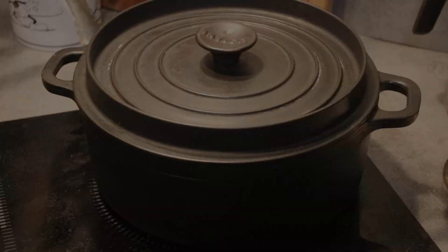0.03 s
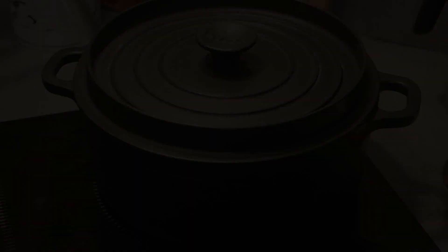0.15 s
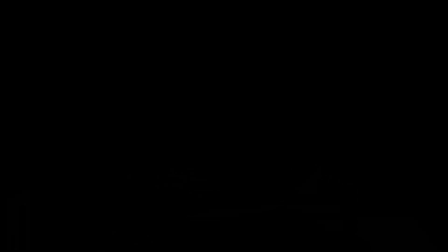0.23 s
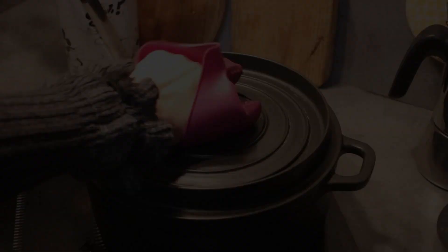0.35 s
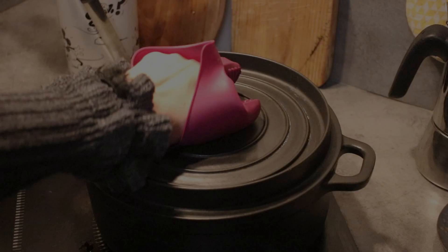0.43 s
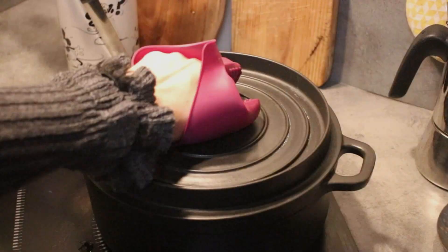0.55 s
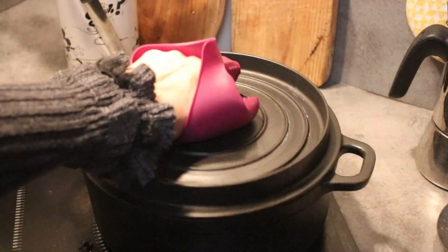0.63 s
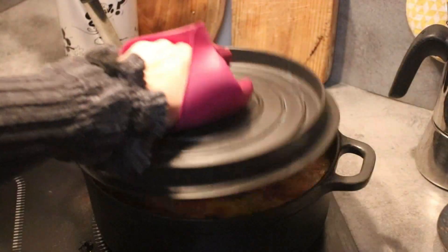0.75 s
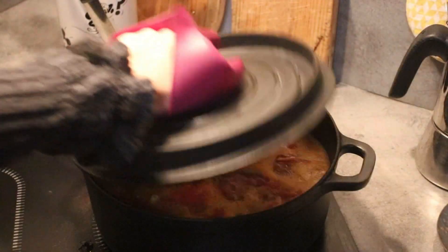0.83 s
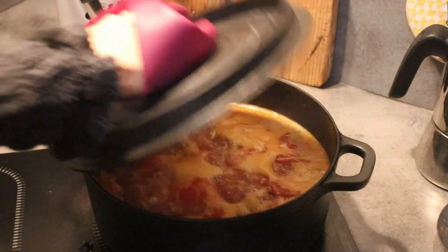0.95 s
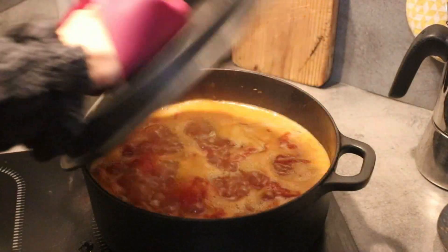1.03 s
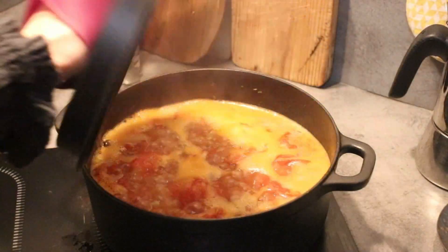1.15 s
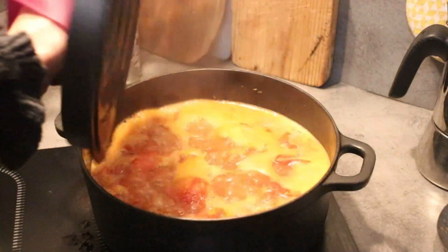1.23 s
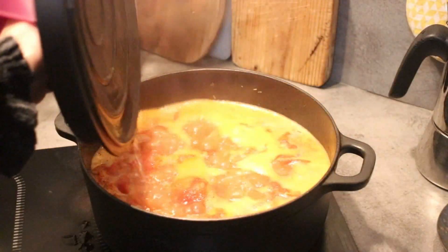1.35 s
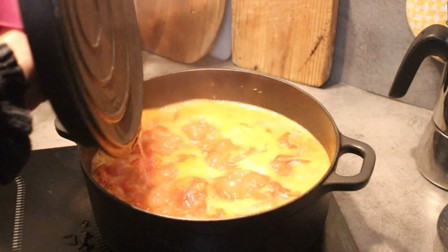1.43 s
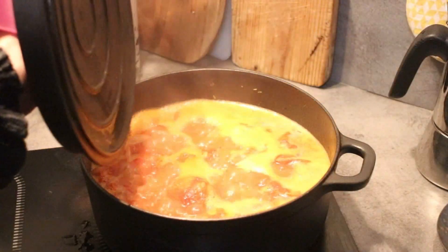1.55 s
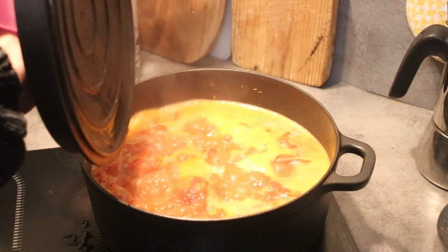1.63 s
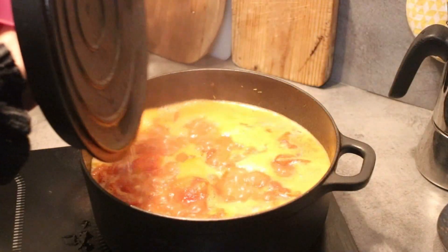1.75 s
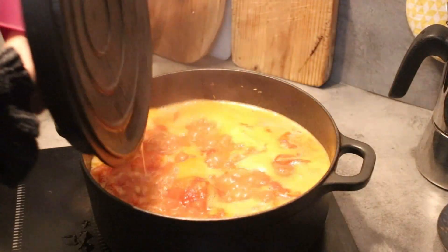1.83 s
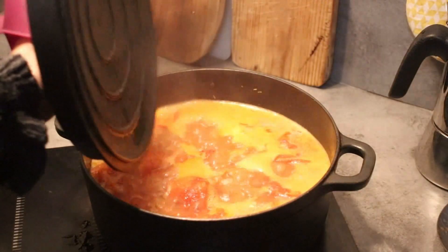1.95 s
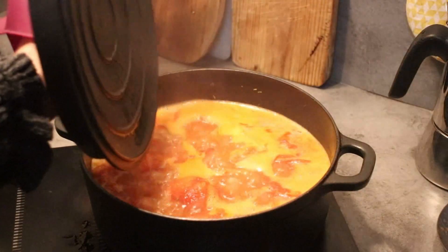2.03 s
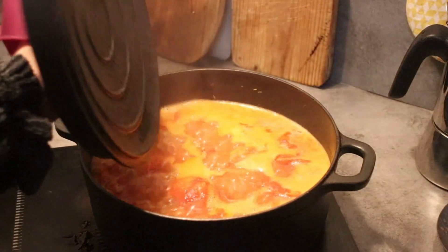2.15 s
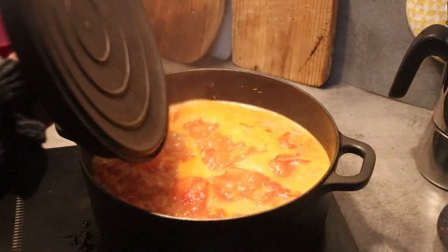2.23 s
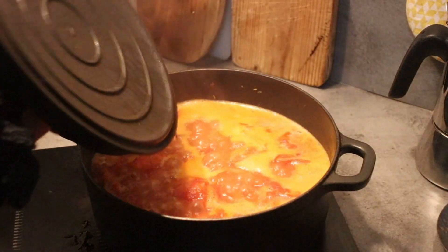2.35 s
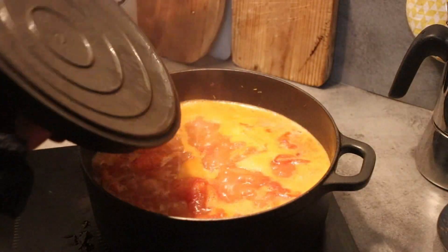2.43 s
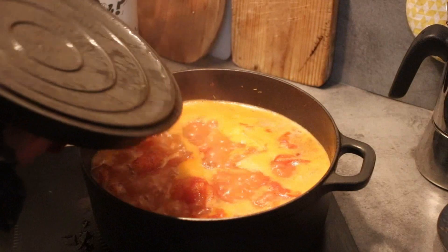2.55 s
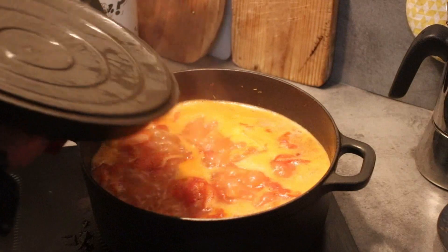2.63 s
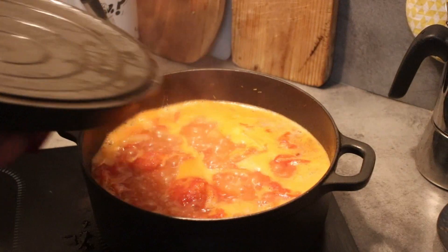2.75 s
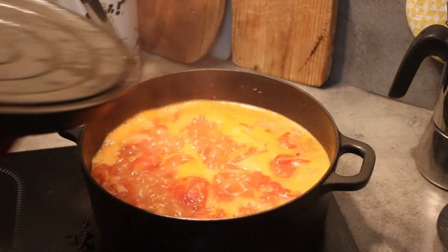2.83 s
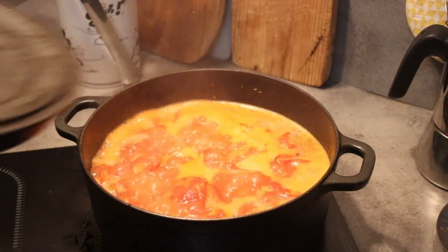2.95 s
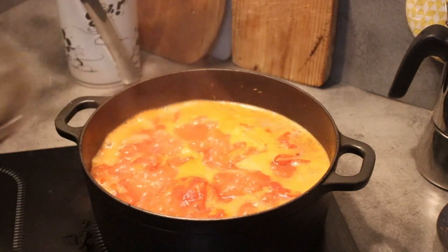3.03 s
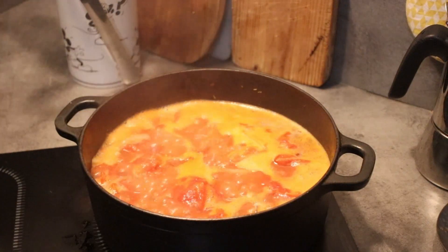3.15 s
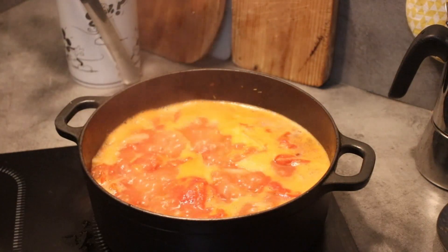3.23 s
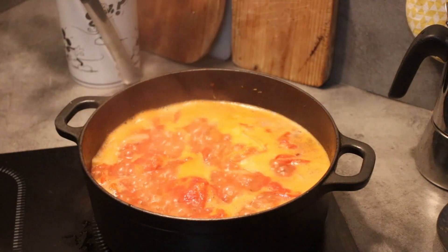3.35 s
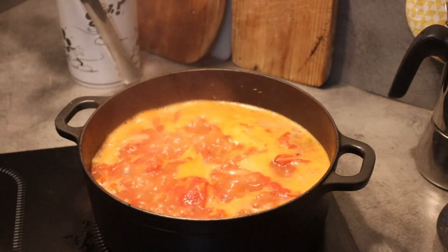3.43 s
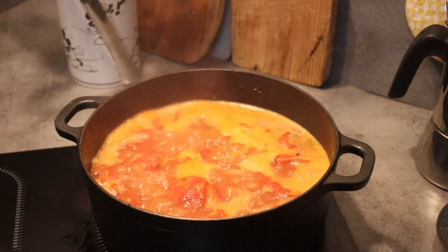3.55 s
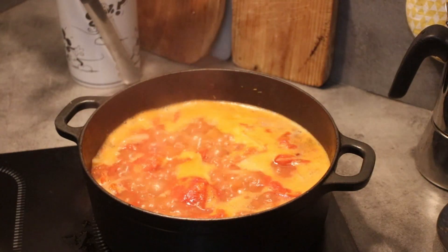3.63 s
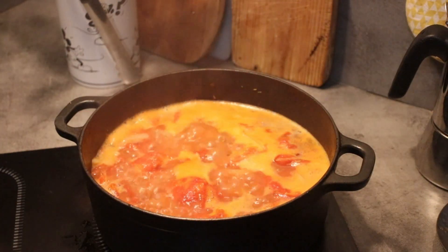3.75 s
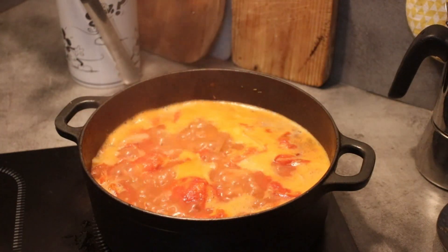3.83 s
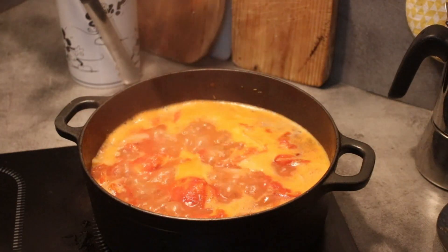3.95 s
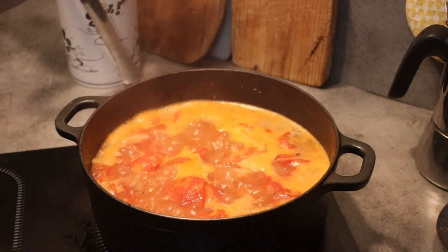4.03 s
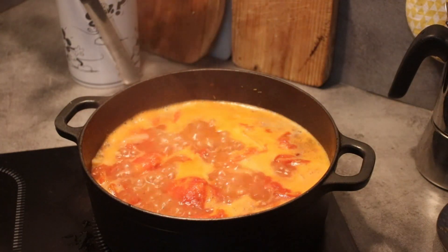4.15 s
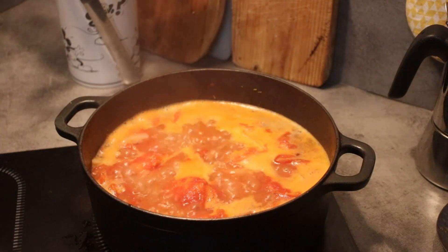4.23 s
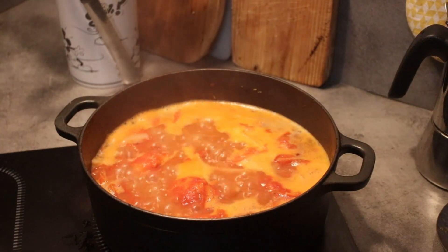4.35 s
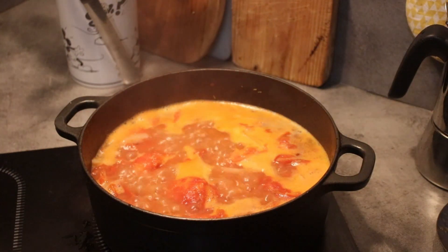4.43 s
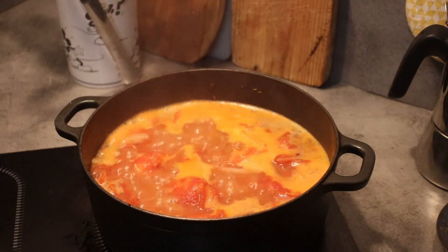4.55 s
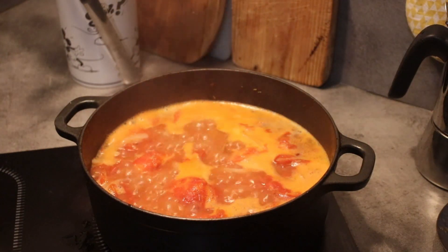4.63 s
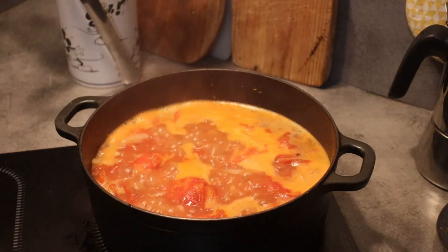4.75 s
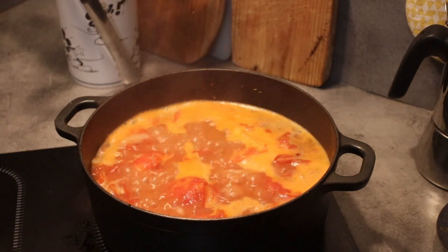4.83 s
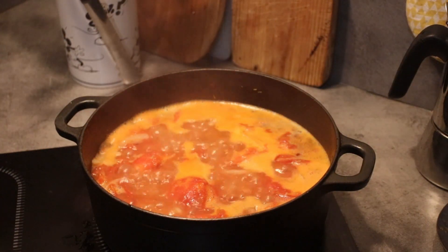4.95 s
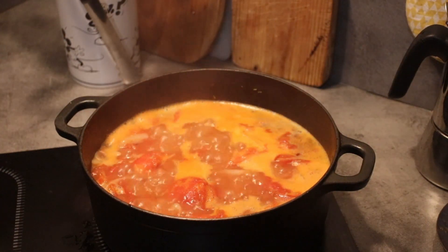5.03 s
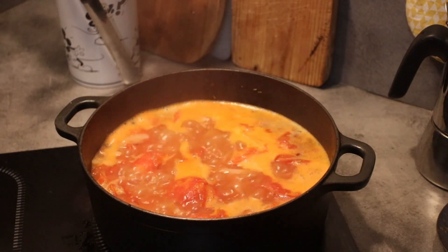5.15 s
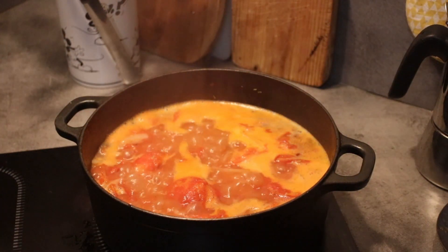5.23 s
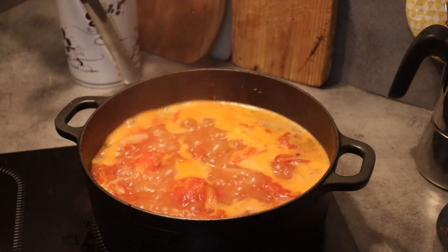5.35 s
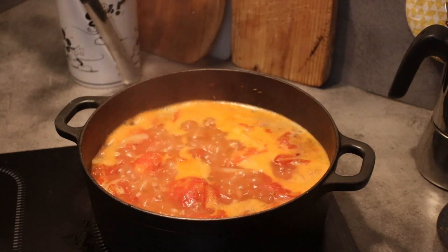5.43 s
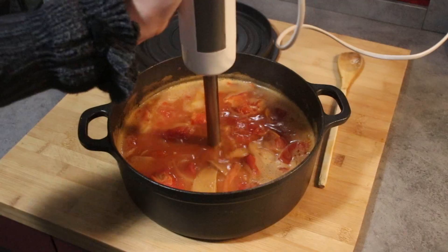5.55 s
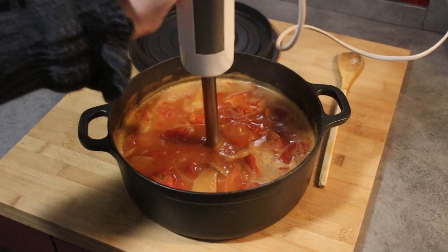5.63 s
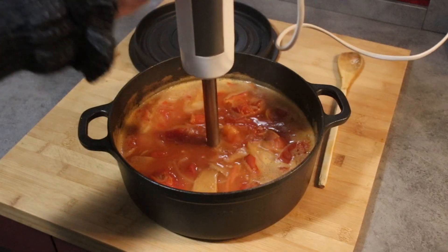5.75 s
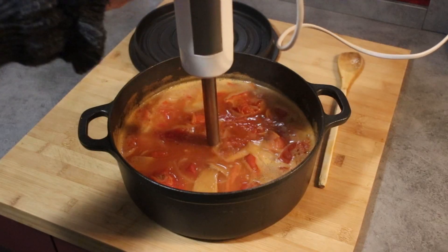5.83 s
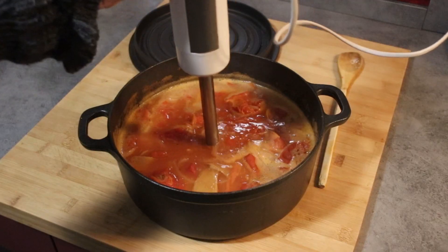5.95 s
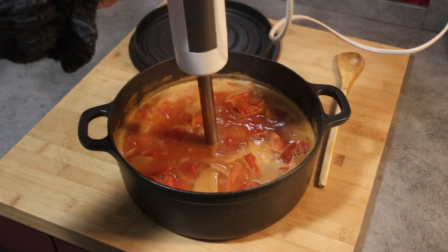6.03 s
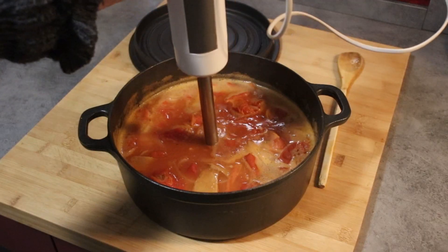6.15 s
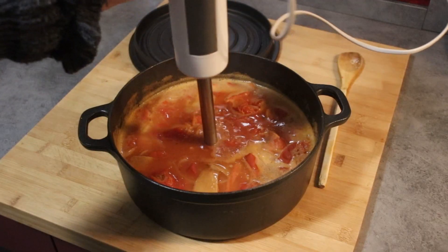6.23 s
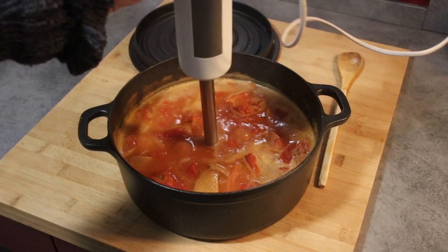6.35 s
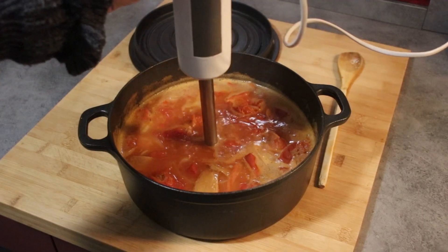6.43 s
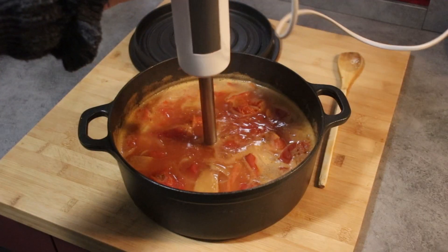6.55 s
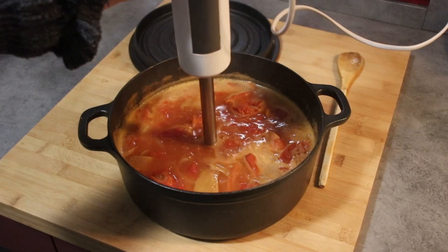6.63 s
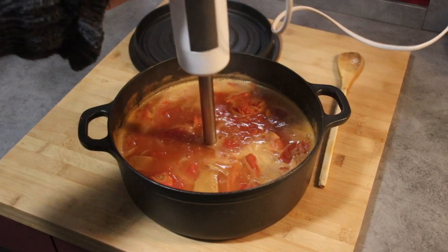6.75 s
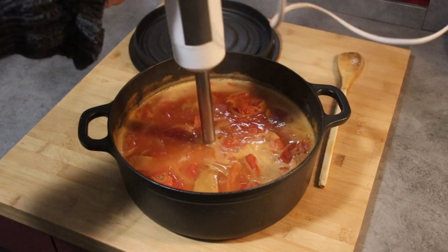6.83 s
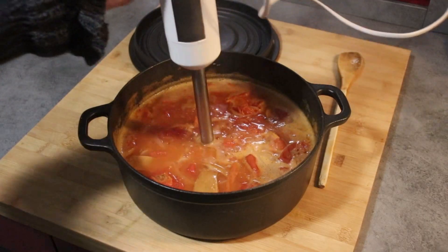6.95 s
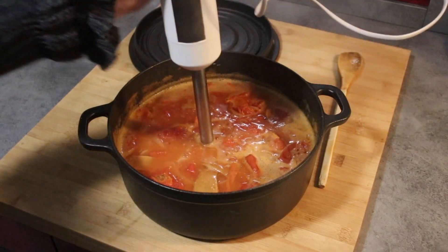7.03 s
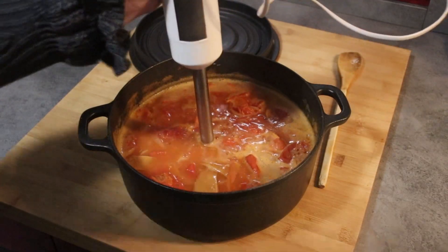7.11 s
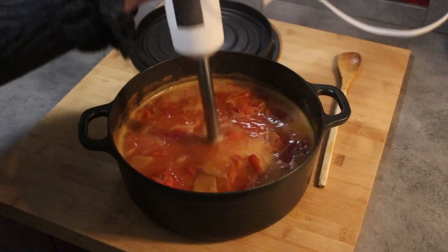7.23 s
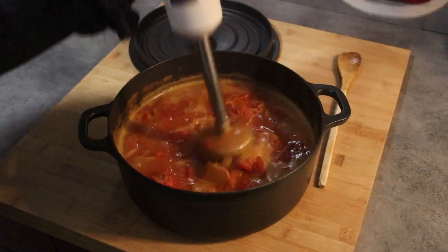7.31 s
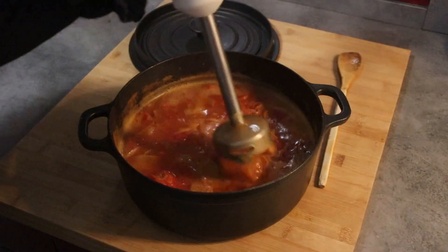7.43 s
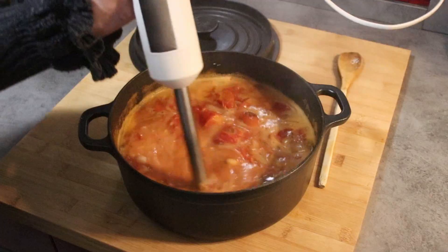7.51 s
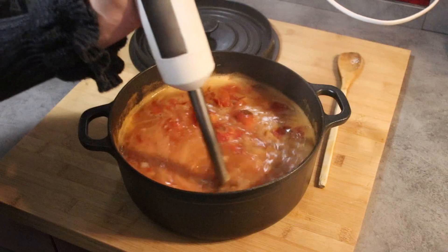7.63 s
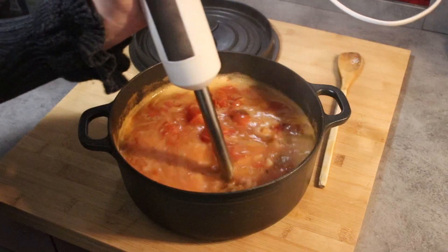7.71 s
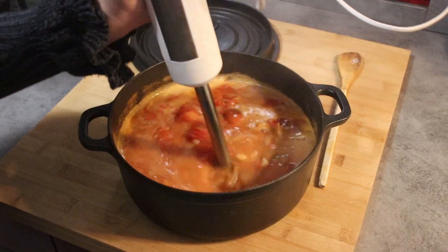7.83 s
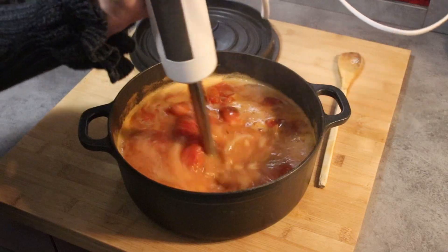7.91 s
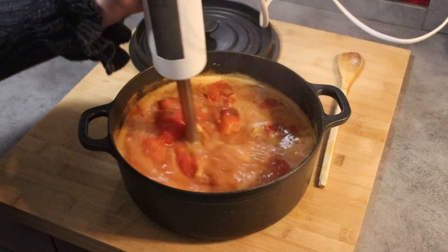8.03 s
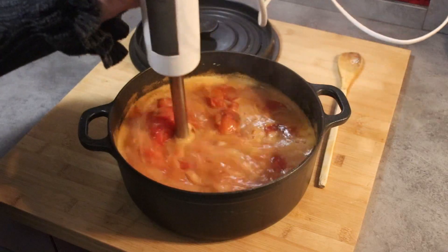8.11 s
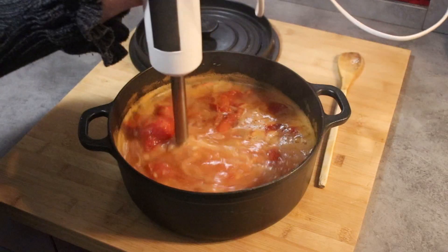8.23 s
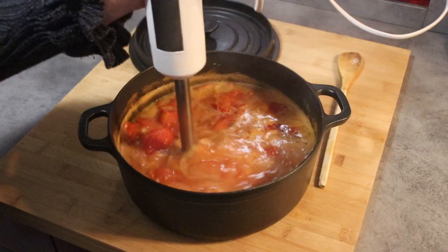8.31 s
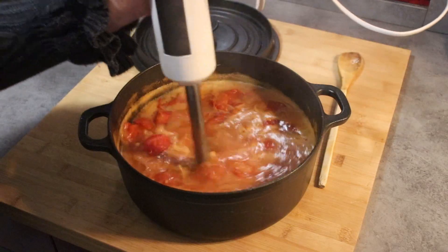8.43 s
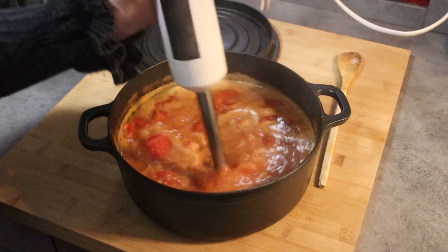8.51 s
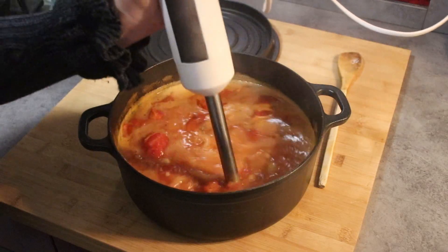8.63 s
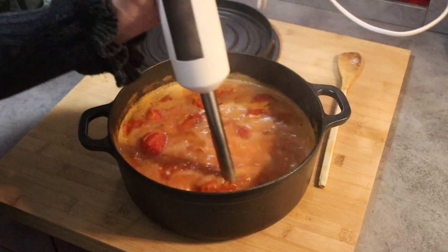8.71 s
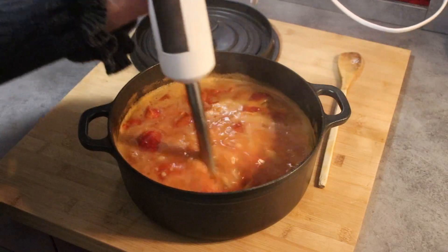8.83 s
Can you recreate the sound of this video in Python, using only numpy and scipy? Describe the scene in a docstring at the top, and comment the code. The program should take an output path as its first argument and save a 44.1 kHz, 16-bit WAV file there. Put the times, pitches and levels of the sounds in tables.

```python
"""Soup on the stove, then a hand blender

A kitchen in two scenes. Soup simmers under a humming hood: shaped noise, wavering tones, spits and bubbles.
The cast-iron lid slides off and clangs: knocks and grinding ring its modes. Then, on a quiet worktop, a
blender spins up in the soup and runs down through splashes; after a jump it churns on deep in the pot.
It is built from multiples of its shaft speed, throbbing air noise, slosh and gurgles."""
import sys
import numpy as np
from scipy import signal
from scipy.fft import rfft, irfft, next_fast_len
from scipy.io import wavfile
from scipy.ndimage import uniform_filter1d

SR = 44100
rng = np.random.default_rng(int(sys.argv[2]) if len(sys.argv) > 2 else 0)


def wrap_up_sound(samples):
    """Save the sound to the file named by the first command line argument, as 16-bit audio."""
    columns = np.atleast_2d(samples).T
    # keep every value between -1 and 1, then stretch to whole-number steps
    tamed = np.clip(columns, -1, 1)
    steps = np.round(tamed * 32767).astype(np.int16)
    wavfile.write(sys.argv[1], SR, steps)


N = 391608
END_S = 8.88

# start of the stove scene and of the quiet worktop: t/s
SCENE_STARTS = (0.271, 5.511)
LINGER_DB, LINGER_T60_S = -15.5, 0.2  # the stove lingers faintly into the worktop scene

# quiet worktop, colour of the background hiss: f/Hz, relative level per Hz/dB
QUIET_COLOUR = [(35, -27), (97, -13), (337, -10.5), (567, -14), (629, -8.5), (978, -18), (2310, -22.5),
                (2920, -20), (3680, -23), (15000, -38)]
QUIET_DB = -75
# rustles on the worktop: peak t/s, level/dB, rise/s, t60/s
RUSTLES = [(5.72, -71, .05, .5), (5.785, -72, .015, 0.43)]

# hood and boiling over time: t/s, rumble level/dB, sizzle level/dB
SIMMER_LEVELS = [(.28, -52.5, -61), (.36, -49.5, -56.5), (.95, -45, -53.5), (1.35, -43.5, -54.5),
                 (1.46, -45.5, -42.5), (2.4, -47.5, -41), (3.55, -47, -40.5), (3.95, -49, -44.5),
                 (4.8, -45, -45), (5.0, -46.5, -49.5), (5.5, -47.5, -51.5)]
# colour of the rumble: f/Hz, relative level per Hz/dB
RUMBLE_COLOUR = [(22, -30.5), (42, -1.5), (65, -0.5), (140, -2.5), (331, 4), (381, -3.5), (438, 3.5),
                 (515, -4.5), (616, 0.5), (866, -6.5), (1270, -5.5), (1520, -11), (3000, -15), (3900, -20),
                 (6600, -120)]
# colour of the sizzle: f/Hz, relative level per Hz/dB
SIZZLE_COLOUR = [(710, -29.5), (1200, -10.5), (1280, -3), (1590, -6), (4550, -3.5), (6720, -5.5),
                 (7250, -4), (14400, -15), (16000, -26.5)]
# wavering hood tones: f/Hz, middle level/dB
HOOD_TONES = [(51, -57.5), (91.5, -62), (275, -64), (339.1, -62.5), (425.3, -62), (560, -68), (631, -61),
              (710.6, -63.5)]
# fat spits: t/s, peak level/dB, centre f/Hz, left minus right/dB
FAT_SPITS = [(1.302, -35, 9000, 4), (1.4218, -30, 8990, 5), (1.4479, -26, 10190, 7),
             (1.6489, -27.5, 3480, 6), (2.2319, -30, 7190, 1), (2.2429, -26, 4300, 3.0),
             (2.2529, -21, 4440, 7), (2.4421, -21, 5560, 0), (2.6372, -17, 4100, 6),
             (2.8078, -23, 4000, 2.0), (2.867, -29, 9000, -4), (2.9654, -27, 7540, -1),
             (2.9934, -17.5, 5200, 3), (3.0905, -26, 4500, 3), (3.1635, -17.5, 6240, 5),
             (3.3466, -21, 7220, 4), (3.3685, -21, 7420, 1.5), (3.4124, -17, 9200, 6),
             (3.5701, -19, 8600, 11), (3.7666, -26, 5000, 6), (3.8943, -25.5, 4700, 6),
             (4.041, -22.5, 6700, 7), (4.0669, -21, 5170, 4), (4.2021, -31, 2980, 6),
             (4.5643, -22, 3200, 4.5), (4.7469, -22.5, 5730, 7), (4.8881, -23.5, 3000, 7)]
SPIT_HOLD_S, SPIT_T60_S, SPIT_TAIL_DB, SPIT_GRAIN_DB = .004, .032, -14, 3.5
# bursting bubbles: t/s, reference level/dB (song and flurry lie below it), starting f/Hz
SOUP_BUBBLES = [(0.832, -31.5, 1260), (1.466, -24.5, 1230), (3.07, -29, 1033), (3.239, -33, 1260),
                (3.368, -28, 875), (3.412, -30, 1090), (3.485, -26, 1360), (3.509, -30, 702),
                (4.012, -28, 724), (4.025, -28.5, 1216), (4.606, -26.5, 1132), (4.778, -24, 1180),
                (4.928, -25.5, 1226), (5.227, -27, 980), (5.24, -19, 1230)]

# squeaks of one lid mode as it slides: peak t/s, level/dB, rise/s, t60/s
LID_SQUEAKS = [(.71, -53, 0.0076, 0.2), (.778, -47.5, .006, 0.34)]
SQUEAK_HZ = 3230
# low rub that climbs as the gap opens: t/s, centre f/Hz, level/dB
LID_RUB = [(.7, 335, -58), (.77, 350, -48), (.82, 460, -51), (.87, 595, -51), (1.02, 620, -55)]
# ringing modes of the lid: f/Hz, relative level/dB, t60/s
LID_MODES = [(88, -5, 0.25), (264, -13, 0.25), (485, -13, .2), (619.6, -4, 0.2), (716, -9, .2),
             (812, -10, 0.12), (1040, 2, 0.12), (1744, -8, .9), (1779, -14, .4), (1927, -12, .2),
             (2000, -7, 0.2), (2449, 1, 0.4), (3216, -7, .4), (3224, -6, .35), (3467, -8, .4),
             (4059, -14, .2), (4727, -3, .36), (4768, -7, .36), (6223, -3, .27), (7580, -13, .22),
             (8032, -17, .16), (8915, -19, .25), (10210, -22, .17), (11540, -28, .15), (12560, -29, .1),
             (13390, -33, .14), (14300, -33, .14)]
# lid touches the rim: t/s, strength/dB, brightness above 3 kHz/dB per octave
LID_KNOCKS = [(1.031, -18, -18.5), (1.075, -25.5, -11.5), (1.112, -33, 8)]
# lid grinds along the rim: peak t/s, strength/dB, rise/s, t60/s, brightness around 2 kHz/dB per octave
LID_GRINDS = [(1.05, -37, 0.024, 0.43, -2.5), (1.115, -39, .06, 0.33, 7.5), (1.155, -43, .03, 0.27, 7)]
# small dry ticks: t/s, peak level/dB, centre f/Hz
SMALL_TICKS = [(0.4369, -30, 2570), (5.5854, -53.5, 8700), (5.7716, -59, 5940), (6.2893, -40, 4160),
               (6.315, -43, 1520), (6.3404, -38, 3740)]

# air pockets gurgle out round the blade: t/s, reference level/dB, starting f/Hz
BLADE_GURGLES = [(7.3, -48.5, 850), (7.36, -53, 847), (7.79, -47, 1340), (7.86, -46, 1464),
                 (7.99, -44, 467), (8.05, -46, 660), (8.2, -46, 1500), (8.78, -43, 900), (8.8, -44, 1590)]
# droplets flick off the slowing blade: t/s, peak level/dB, centre f/Hz
BLADE_DROPS = [(7.2237, -43, 4390), (7.2412, -39, 3350), (7.3055, -43, 4390), (7.398, -51, 5650),
               (7.4243, -52, 3080)]
# colour of the blender's air and brush noise: f/Hz, relative level per Hz/dB
AIR_COLOUR = [(710, -10), (1200, -12), (1460, -5.5), (2680, -5.5), (3400, -5), (5970, -4), (10500, -8.5),
              (12100, -16), (15200, -14.5), (16000, -29)]
# colour of the sloshing soup: f/Hz, relative level per Hz/dB
SLOSH_COLOUR = [(35, -62), (60, -42), (131, -8.5), (372, -9), (415, -5), (813, -8), (1150, -11),
                (2500, -21), (3250, -28), (5500, -120)]

# first run, hum once a turn: t/s, level/dB
FIRST_HUM = [(6.289, -86), (6.305, -60), (6.36, -56), (6.43, -64), (6.5, -53), (6.6, -56.5), (6.72, -73),
             (6.83, -67), (6.87, -55), (6.96, -61), (7.02, -53.5), (7.13, -58), (7.18, -68)]
# first run near the surface, multiples 2, 3, 4 .. of the shaft speed: relative level/dB
SURFACE_MULTIPLES = [-5, -5, -4, -4, -1, -2, -4, -8, -3, -6, -2, -10, -2, -3, -7, -9, -3, -7, -1, -5, -3,
                     -7, -9, -6, -3, -8, -5, -8, -10, -11]
# soup surges round the blade: peak t/s, level/dB, rise/s, t60/s
SOUP_SURGES = [(6.335, -50, 0.075, 0.68), (6.87, -63, 0.036, 1.3), (7.015, -54, 0.052, 1.6),
               (7.242, -68, 0.021, 0.44), (7.31, -76, 0.016, 1.5)]
# fine spray as the blade slows: peak t/s, level/dB, rise/s, t60/s
FINE_SPRAY = [(6.86, -57, .015, 0.91), (7.242, -55, 0.013, 0.077), (7.32, -68, 0.024, 0.051)]
ON_S, OFF_S, STILL_S = 6.289, 6.845, 7.18  # switched on, switched off, shaft silent
KICK_HZ, FULL_HZ, SPIN_UP_S = 135.9, 221.8, .058  # turns a second at the start and at full speed
CRAWL_HZ, COAST_S = 86, 0.23  # the shaft coasts down towards a crawl
WHINE_DB, WHINE_RISE_S = -55.5, 0.04
UNPOWERED_DB, WHINE_FADE_DB_PER_S = -8, 35  # whine drops at switch-off, then fades
AIR_DB, AIR_RISE_S, AIR_FADE_DB_PER_S = -48, 0.024, 22.5
DULLING_S = 1  # the top of the air noise dies first as the shaft slows
FADE_OUT_S, FADE_OUT_DB_PER_S = 7.42, 140  # air noise and slosh fade before the jump

# second run, load changing as the blender is moved: t/s, turns f/Hz, hum level/dB
CHURN_COURSE = [(7.51, 202.7, -75), (7.58, 203.5, -62), (7.66, 203.2, -68), (7.92, 206.3, -55),
                (8.0, 205.2, -53), (8.09, 207.4, -64), (8.32, 209.6, -61), (8.41, 211.4, -52),
                (8.48, 211.4, -50.5), (8.7, 210.5, -59.5), (8.76, 211, -55), (8.88, 211, -52)]
# second run deep in the soup, multiples 2, 3, 4 .. of the shaft speed: relative level/dB
DEEP_MULTIPLES = [2.5, -7, 1, -6, -6, -3.5, -4.5, -7, -10.5, -8.5, -10, -14, -12, -8, -2.5]
# brief dips of its noise and whine: t/s, depth/dB, time to shrink to about a third/s
CHURN_DIPS = [(7.645, -8.5, 0.062), (8.6, -4.5, 0.069)]
CHURN_WHINE_DB, CHURN_AIR_DB, CHURN_SLOSH_DB = -59.5, -47.5, -53
CHURN_START_S = CHURN_COURSE[0][0]

TOP_HZ = 15900  # nothing much is heard above this


def undb(db):
    """Turn decibels into a plain gain."""
    return 10 ** (np.asarray(db, float) / 20)


def unit(x):
    """Scale to an average (rms) level of 1."""
    return x / np.sqrt(np.mean(x ** 2))


def curve(rows):
    """Columns of a table at every sample, joined by straight lines."""
    s, *columns = np.transpose(rows)
    return [np.interp(np.arange(N) / SR, s, c) for c in columns]


def walk(rate, size=N):
    """A smooth random level that turns about `rate` times a second; spread near 1."""
    steps = np.repeat(rng.standard_normal(int(size * rate / SR) + 2), 8)
    steps = uniform_filter1d(uniform_filter1d(steps, size=8), size=8)
    return 1.3 * np.interp(np.arange(size) * 8 * rate / SR, np.arange(len(steps)), steps)


def swells(rows):
    """Summed gains of (peak s, dB, rise s, t60 s) rows: a smooth rise, then a decay."""
    t = np.arange(N) / SR
    total = 0
    for s, db, rise, t60 in rows:
        growth = np.clip(1 + (t - s) / rise, 0, 1) ** 2
        decay = 1000. ** (-np.maximum(t - s, 0) / t60)
        total = total + undb(db) * growth * decay
    return total


def pan(x, db):
    """Make the left side `db` louder than the right."""
    return x * undb(np.array([[db], [-db]]) / 2)


def add(out, s, x):
    """Mix x into out from second s on."""
    i = int(s * SR)
    out[:, i:i + x.shape[1]] += x[:, :N - i]


def band_pass(x, edges):
    """Keep mainly the sound between two frequencies in Hz."""
    return signal.sosfilt(signal.butter(2, edges, "band", fs=SR, output="sos"), x)


def hiss(span, shape, wide_hz, flicker_db, rate, grain_db=0., lean_db=0.):
    """Stereo noise over a span, in octave bands that flicker alone; more alike left and right in the bass."""
    n = next_fast_len(int((span[1] - span[0]) * SR))
    f, (hz, db) = np.fft.rfftfreq(n, 1 / SR) + 1, np.transpose(shape)
    noise = rng.standard_normal((2, n))
    grains = undb(grain_db * np.minimum(rng.exponential(size=n), 5))
    mid, side = rfft(noise * grains)
    share = np.clip(f / wide_hz, .03, .9)  # how far the two sides differ
    both = mid + share * side * np.array([[1], [-1]])
    both = both * undb(np.interp(np.log(f), np.log(hz), db, -99, -99))
    noise, out = 0, np.zeros((2, N))
    for c in np.arange(np.log2(hz[0]), np.log2(hz[-1]) + 1):
        band = np.cos(np.pi / 2 * np.clip(np.log2(f) - c, -1, 1)) ** 2
        noise = noise + irfft(both * band, n) * undb(flicker_db * walk(rate, n))
    add(out, span[0], pan(unit(noise), lean_db))
    return out


def bursts(rows, t60, width, grain_db=0., tail_db=-59.0, hold=0.):
    """Short noise bursts: a crack of uneven grains coloured round a centre, with a faint longer tail."""
    out, t = np.zeros((2, N)), np.arange(4000) / SR
    fall = 1000 ** (-np.maximum(t - hold, 0) / t60) + undb(tail_db) * 1000 ** (-t / t60 / 4)
    grains = undb(grain_db * np.minimum(rng.exponential(size=(len(rows), 1, len(t))), 4))
    noises = rng.standard_normal((len(rows), 2, len(t))) * grains
    for (s, db, hz, side_db), (mid, side) in zip(rows, noises):
        stereo = np.array([mid + .5 * side, mid - .5 * side])
        x = band_pass(stereo * fall, [hz / (1 + width), min(hz * (1 + width), 12000)])
        add(out, s, pan(x / np.abs(x).max() * undb(db), side_db))
    return out


def bubbles(rows, t60, rise):
    """A bubble sings a few climbing cycles; the froth round it collapses in a wet flurry near the same pitch."""
    out, t = np.zeros((2, N)), np.arange(4000) / SR
    for s, db, hz in rows:
        song = np.sin(2 * np.pi * hz * t * (1 + rise * t))
        song = song * 1000 ** (-t / t60) * np.minimum(t / 0.00095, 1)
        add(out, s, pan(song * undb(db - 3.5), 1.4))
    flurries = [(s + .004, db - 5.5, hz, 1.4) for s, db, hz in rows]
    return out + bursts(flurries, 2.0 * t60, 0.38)


def room(x, t60, wet_db):
    """Tiles and worktop add a short tail, different on each side except in the bass."""
    t = np.arange(12000) / SR
    mid, side = rng.standard_normal((2, len(t))) * 1000 ** (-t / t60) * (t > .003)
    side = signal.sosfilt(signal.butter(2, 450, "high", fs=SR, output="sos"), side)
    tail = np.array([mid + side, mid - side]) / np.sqrt(2 * np.sum(mid ** 2))
    return x + undb(wet_db) * signal.fftconvolve(x, tail, axes=1)[:, :N]


def quiet_worktop():
    """A faint flickering hiss, with noise swelling up for each rustle."""
    start = SCENE_STARTS[1]
    quiet = undb(QUIET_DB) * hiss((start, END_S), QUIET_COLOUR, 2000., 1.2, 5.4, lean_db=1.5)
    rustle_noise = hiss((start, 6.1), RUMBLE_COLOUR[3:], 2000., 2.0, 13, lean_db=1.0)
    return quiet + swells(RUSTLES) * rustle_noise


def hood_tones():
    """Steady hood tones whose level and phase waver."""
    t, tones = np.arange(N) / SR, 0
    for hz, db in HOOD_TONES:
        level = undb(db + 4 * walk(3)) * np.sqrt(2)
        tones = tones + level * np.sin(2 * np.pi * hz * t + 1.5 * walk(9))
    return tones


def simmer():
    """Hood rumble and tones, a grainy sizzle in surges, loud spits and bubbles among many small ones."""
    rumble_db, sizzle_db = curve(SIMMER_LEVELS)
    tones = hood_tones()
    rumble_gain = undb(rumble_db + 0.95 * walk(5))
    out = rumble_gain * hiss((0, 5.6), RUMBLE_COLOUR, 2000.0, 1.6, 7.4, lean_db=4.0) + tones
    sizzle_gain = undb(sizzle_db + 1 * walk(24))
    out += sizzle_gain * hiss((0, 5.6), SIZZLE_COLOUR, 3900.0, 1.2, 17, 2.67, 2.3)
    # small bubbles and spits at random moments, levels and pitches
    u = rng.random((120, 5)).T
    froth = np.c_[1.4 + 4.1 * u[0], -43 + 10 * u[1], 500 * 3.0 ** u[2]]
    specks = np.c_[1.4 + 3.6 * u[3], -38 + 7 * u[4], 1500 * 5.5 ** u[1], 8 * u[2]]
    out += bursts([*FAT_SPITS, *specks], SPIT_T60_S, 0.73, SPIT_GRAIN_DB, SPIT_TAIL_DB, SPIT_HOLD_S)
    return out + room(bubbles(SOUP_BUBBLES, 0.038, 2.5) + bubbles(froth, 0.035, 5.7), 0.22, -0.5)


def stove():
    """The simmer alone, faded in and out quickly, with a faint lingering end."""
    t = np.arange(N) / SR
    start, end = SCENE_STARTS
    fade_in = np.clip((t - start) / 0.0016, 0, 1)
    fade_out = np.clip((end - t) / 0.0017, 0, 1)
    linger = swells([(end, LINGER_DB, .002, LINGER_T60_S)])
    return fade_in * (fade_out + linger) * simmer()


def slide():
    """The sliding lid: a wavering squeak of one mode and a rough, climbing rub."""
    t = np.arange(N) / SR
    hz, db = curve(LID_RUB)
    rubbing = (t > LID_RUB[0][0]) * (t < LID_RUB[-1][0])
    rub_gain = undb(db) * rubbing * walk(60)
    rub = rub_gain * np.sin(2 * np.pi * np.cumsum(hz) / SR + 2.5 * walk(90))
    squeak_gain = swells(LID_SQUEAKS) * undb(2.5 * walk(40))
    squeak = squeak_gain * np.sin(2 * np.pi * SQUEAK_HZ * t + .4 * walk(30))
    return pan(np.sqrt(2) * (rub + squeak), 2.)


def ring(x, hz, t60):
    """One mode, a resonance that dies away: a unit impulse rings with height 1."""
    r, w = np.exp(-np.log(1000) / (t60 * SR)), 2 * np.pi * hz / SR
    return signal.lfilter([np.sin(w)], [1, -2 * r * np.cos(w), r * r], x)


def lid():
    """Knocks and grinding drive the same modes; each mode reaches the two sides at its own strength and moment."""
    span = 2 * SR  # samples
    rough = rng.standard_normal(span) * undb(2.5 * walk(60, span))
    strokes = [swells([row[:4]])[:span] * rough for row in LID_GRINDS]
    grind, out = sum(strokes), np.zeros((2, N))
    places = rng.uniform(-1.375, .8, (len(LID_MODES), 2))
    for (hz, db, t60), (lean, lag) in zip(LID_MODES, places):
        octaves = np.log2(hz / 2000)
        push = 0.035 * sum(x * undb(row[4] * octaves) for x, row in zip(strokes, LID_GRINDS))
        for s, hit_db, bright_db in LID_KNOCKS:
            push[int(s * SR)] += undb(hit_db + bright_db * np.log2(max(hz / 3000, 1)))
        x = pan(undb(db) * ring(push, hz, t60), 4.2 * lean * min(hz / 1000, 1))
        out[:, :span] += x[0], np.roll(x[1], int(12 * lag))
    clatter = bursts([(s, db + 5, 1100., 0.) for s, db, _ in LID_KNOCKS], 0.037, 1.1)
    clatter[:, :span] += 3 * band_pass(grind, [150, 3000])
    # the heavy pot and the hob thud under it
    clatter[:, :span] += 11.0 * band_pass(grind, [45, 150])
    return out + room(clatter, 0.14, -4.5)


def gurgles_and_ticks():
    """Air pockets sing as they escape and small things tick, with a short room tail."""
    gurgles = bubbles(BLADE_GURGLES, 0.15, 0.35)
    ticks = bursts([(*row, .8) for row in SMALL_TICKS], 0.043, 0.32)
    return room(gurgles + ticks, 0.45, -3.5)


def motor(span, controls, orders, waver_db, drag_db):
    """Unbalance hums once a turn; its multiples whine and waver, the high ones weaker below top speed."""
    a, b = int(span[0] * SR), min(int(span[1] * SR), N)
    hz, hum_db, whine_db = (c[a:b] for c in controls)
    turn = 2 * np.pi * np.cumsum(hz * (1 + 0.00305 * walk(29.8, b - a))) / SR
    hum = np.sqrt(2) * undb(hum_db + 2.1 * walk(30.1, b - a)) * np.sin(turn)
    x = pan(hum, 1.0)
    sides = np.array([[1], [-1]])
    phases = rng.standard_normal((len(orders), 2))
    for k, (db, u) in enumerate(zip(orders, phases), start=2):
        slow_db = drag_db * np.log2(max(k / 6, 1)) * np.log2(hz / hz.max())
        gain = undb(whine_db + db + slow_db + waver_db * walk(24.14, b - a))
        # high multiples differ more between the sides
        x += gain * np.sin(k * turn + 3 * u[0] + min(k / 12, 1) * u[1] / 2 * sides)
    out = np.zeros((3, N))
    out[:, a:b] = *x, np.cos(turn)
    return out[:2], out[2]


def first_run():
    """The shaft closes in on full speed, then coasts down against the soup; also gains of air noise and slosh."""
    t = np.arange(N) / SR
    on, off = np.maximum(t - ON_S, 0), np.maximum(t - OFF_S, 0)
    hz = FULL_HZ - (FULL_HZ - KICK_HZ) * np.exp(-on / SPIN_UP_S)
    hz = hz - (FULL_HZ - CRAWL_HZ) * (1 - np.exp(-off / COAST_S))
    whine_db = WHINE_DB - 12 * np.exp(-on / WHINE_RISE_S)
    whine_db = whine_db + UNPOWERED_DB * np.clip(off / .08, 0, 1) - WHINE_FADE_DB_PER_S * off
    fade = undb(-FADE_OUT_DB_PER_S * np.maximum(t - FADE_OUT_S, 0)) * (t < CHURN_START_S)
    air = np.minimum(on / AIR_RISE_S, 1) * undb(AIR_DB - AIR_FADE_DB_PER_S * off) + swells(FINE_SPRAY)
    return (hz, curve(FIRST_HUM)[0], whine_db), air * fade, swells(SOUP_SURGES) * fade


def blender():
    """Two runs; air and brush noise throbs with each turn, soup sloshes below it and droplets flick off."""
    t = np.arange(N) / SR
    controls, air, slosh = first_run()
    first, turn_a = motor((ON_S, STILL_S), controls, SURFACE_MULTIPLES, 3.2, 70)
    dip_db = sum(db * (t > s) * np.exp(-np.abs(t - s) / back) for s, db, back in CHURN_DIPS)
    controls = (*curve(CHURN_COURSE), CHURN_WHINE_DB + dip_db)
    second, turn_b = motor((CHURN_START_S, END_S), controls, DEEP_MULTIPLES, 4.6, 60.0)
    churning = (t > CHURN_START_S) * uniform_filter1d(undb(dip_db), size=800)
    air = air + churning * undb(CHURN_AIR_DB)
    slosh = slosh + churning * undb(CHURN_SLOSH_DB)
    throb = 1 + 0.16 * (turn_a + turn_b)
    noise = hiss((6.2, END_S), AIR_COLOUR, 3000.0, 1.06, 24.26, .8, 0.47)
    dull = signal.sosfilt(signal.butter(2, 7000, fs=SR, output="sos"), noise)
    top_gain = np.where(t < CHURN_START_S, np.exp(-np.maximum(t - OFF_S, 0) / DULLING_S), 1)
    noise = dull + (noise - dull) * top_gain
    out = air * throb * undb(0.5 * walk(40)) * noise
    out += bursts([(*row, 1.) for row in BLADE_DROPS], 0.03, 0.97)
    slosh_gain = slosh * undb(1.3 * walk(60) + 1.5 * walk(9))
    out += slosh_gain * hiss((6.2, END_S), SLOSH_COLOUR, 1730.0, 2., 24.75, lean_db=2.1)
    return first + second + out


def scene():
    """The stove with its lid, then the quiet worktop with the blender."""
    quiet = quiet_worktop()
    hits = lid() + slide() + gurgles_and_ticks()
    return stove() + hits + quiet + blender()


def record(dry):
    """Filters take away the deepest bass and the top."""
    dry = signal.sosfilt(signal.butter(2, 26, "high", fs=SR, output="sos"), dry)
    return signal.sosfilt(signal.ellip(10, .2, 70, TOP_HZ, fs=SR, output="sos"), dry)


dry = scene()
out = record(dry)
wrap_up_sound(out)
```